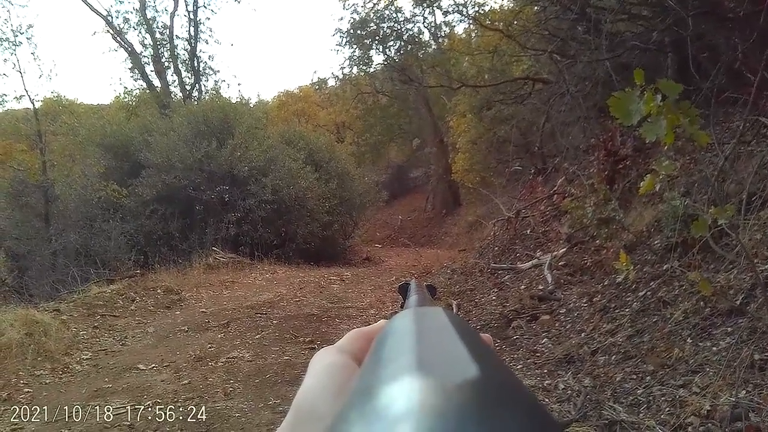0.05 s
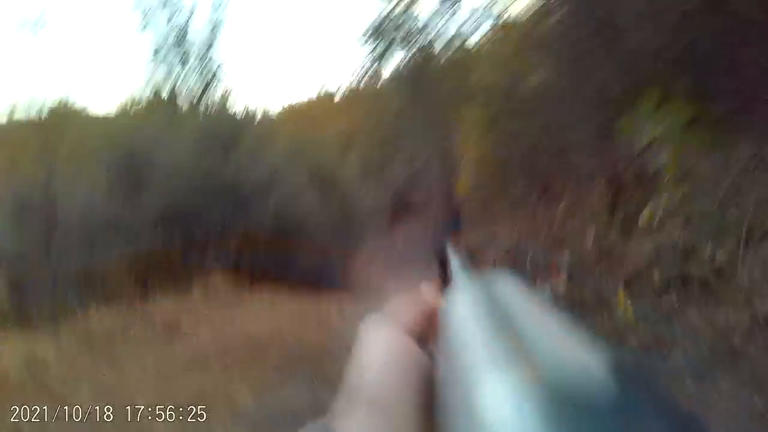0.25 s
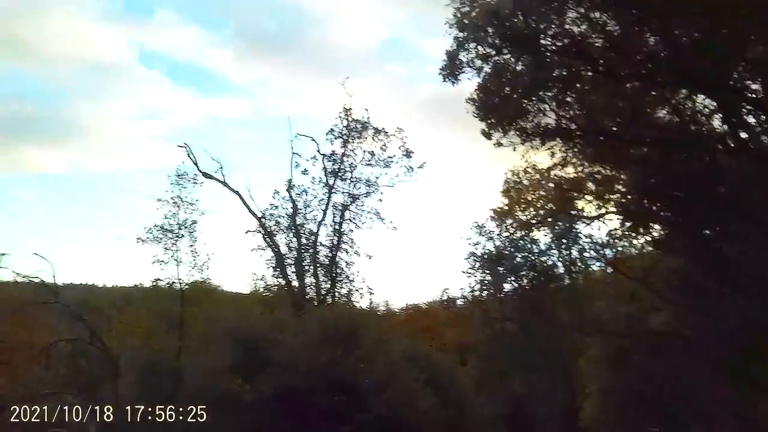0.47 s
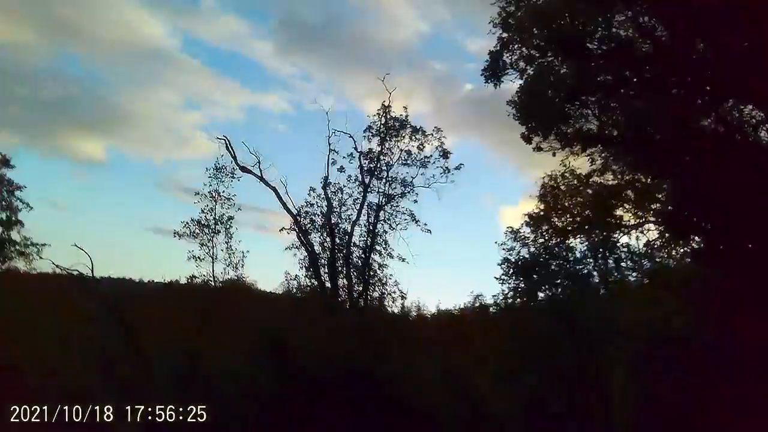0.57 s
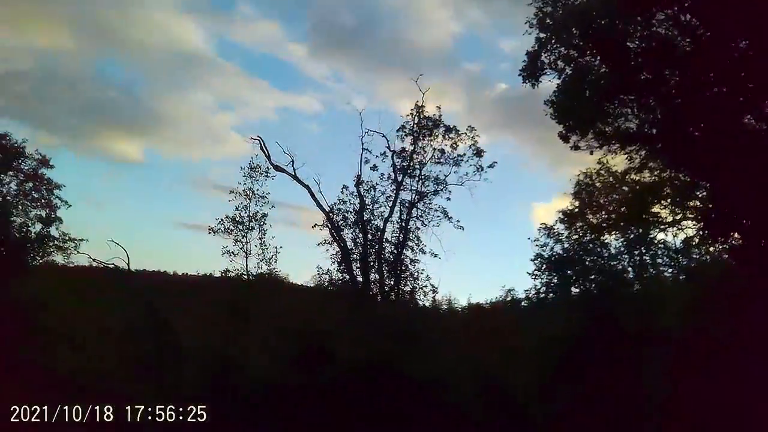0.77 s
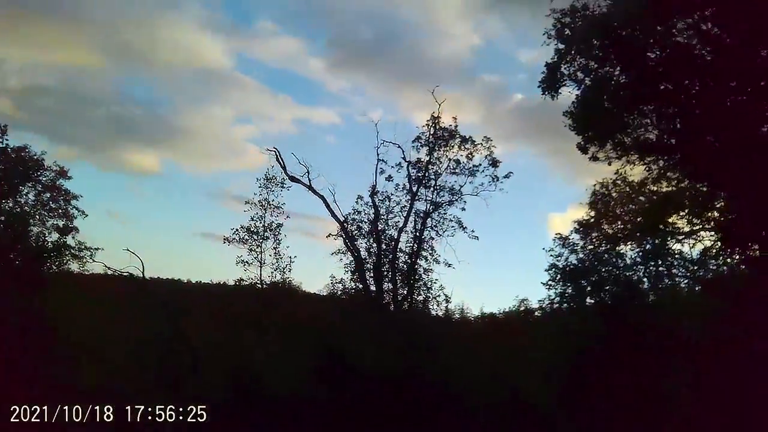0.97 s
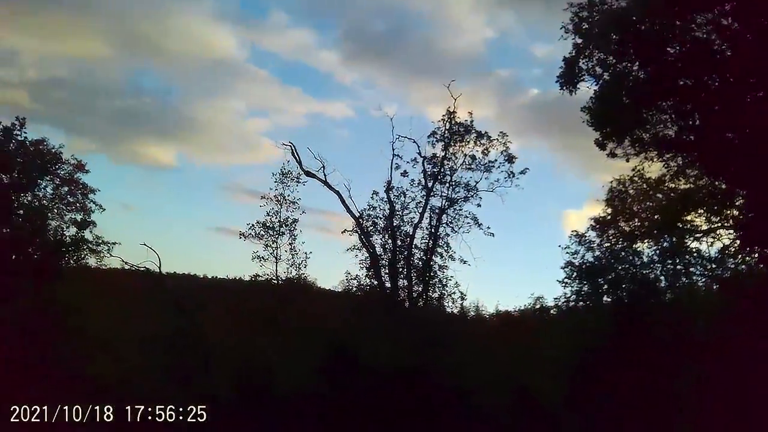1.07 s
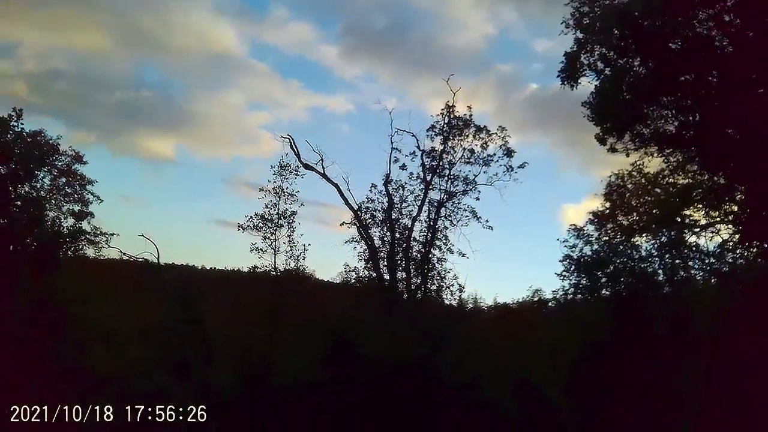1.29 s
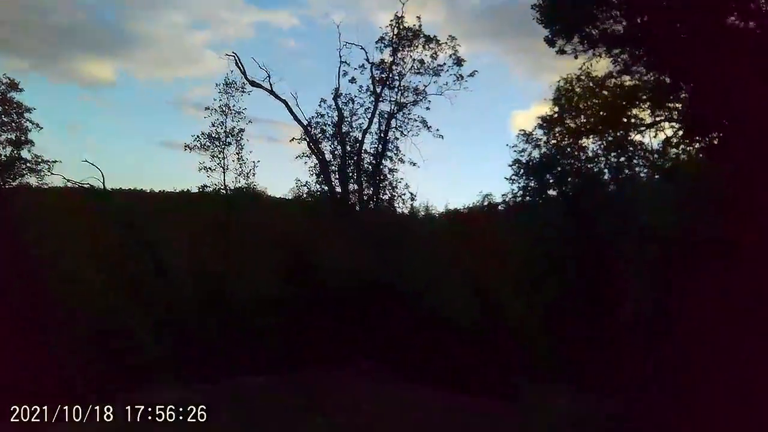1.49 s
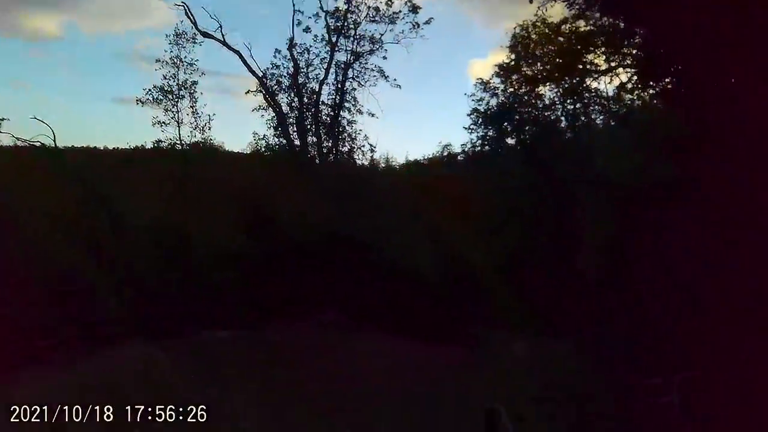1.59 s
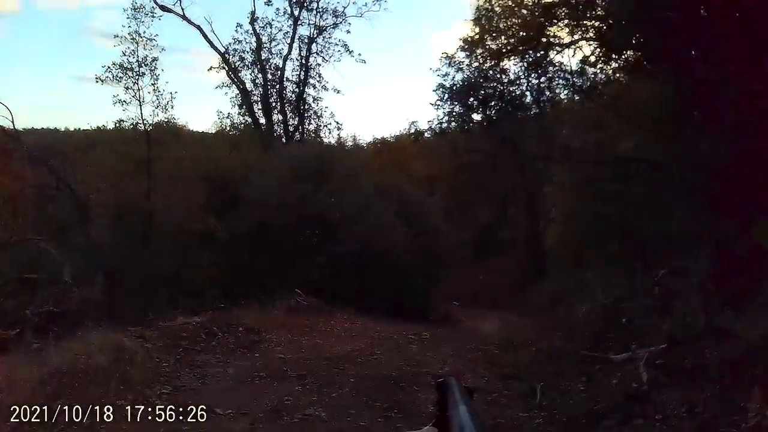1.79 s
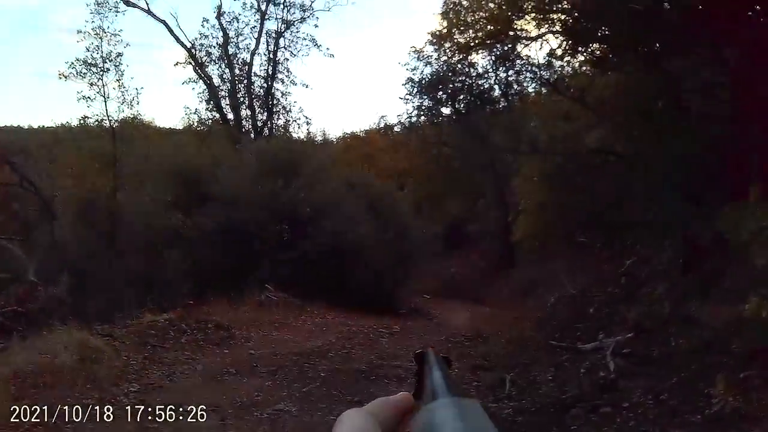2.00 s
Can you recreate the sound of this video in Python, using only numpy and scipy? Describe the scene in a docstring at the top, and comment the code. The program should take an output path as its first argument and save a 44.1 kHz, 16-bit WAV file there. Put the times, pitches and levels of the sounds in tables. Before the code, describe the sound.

A shotgun blast echoes through woods, followed by short plastic rattles and knocks.

```python
"""A shotgun fires on a wooded trail, overloading the microphone of a small camera beside it.
The blast cracks and booms, and its echoes roll away through the trees, dulled by the air.
The recoil jolts the camera, which bumps and rattles in its mount. As the gun is lowered,
clothing rustles faintly and small metal parts click together and ring."""
import sys
import numpy as np
from scipy import signal
from scipy.fft import rfft, irfft
from scipy.io import wavfile
from scipy.ndimage import uniform_filter1d

SR = 44100
rng = np.random.default_rng(int(sys.argv[2]) if len(sys.argv) > 2 else 0)


def generate_wav(signal):
    """Clip the signal to [-1, 1] and save it as 16-bit WAV at the path in sys.argv[1]."""
    frames = np.transpose(np.atleast_2d(signal))
    scaled = np.clip(frames, -1, 1) * 32767
    pcm = np.round(scaled).astype(np.int16)
    wavfile.write(sys.argv[1], SR, pcm)


N = 90404


def amp(db):
    """Converts decibels to an amplitude ratio."""
    return 10 ** (np.asarray(db) / 20)


def unit_rms(x):
    """Normalises a signal to unit mean power."""
    return x / np.sqrt(np.mean(x ** 2) + 1e-20)


def spectrum_db(points, hz):
    """Interpolates a spectrum on a logarithmic frequency axis."""
    f, db = np.transpose(points)
    return np.interp(np.log(hz + 1), np.log(f + 1), db)


def envelope(points):
    """Interpolates a level curve in dB to a gain at every sample."""
    return amp(np.interp(np.arange(N) / SR, *np.transpose(points)))


def add(mix, start, sound):
    """Superposes a sound on the mix at a start time in seconds."""
    part = mix[round(start * SR):][:len(sound)]
    part += sound[:len(part)]


def colour(x, points, size=4096):
    """Minimum-phase filter: the phase follows from the log gain by the Hilbert transform."""
    log_gain = np.log(amp(spectrum_db(points, abs(np.fft.fftfreq(size, 1 / SR)))))
    taps = np.fft.ifft(np.exp(np.conj(signal.hilbert(log_gain)))).real
    return signal.oaconvolve(x, taps[:size // 2])[:len(x)]


def noise(points):
    """Filters white noise to the given spectrum, at unit power."""
    return unit_rms(colour(rng.standard_normal(N), points))


def resonate(x, hz, width_hz):
    """A damped resonator passes a band around its natural frequency."""
    pole = np.exp((2j * hz - width_hz) * np.pi / SR)
    return 2 * signal.lfilter([1 - abs(pole)], [1, -pole], x).real


def steadied(x, size=90):
    """Divides noise by its running rms, so that an envelope alone sets its strength."""
    return x / np.sqrt(abs(uniform_filter1d(x ** 2, size)) + 1e-12)


def hammer(start=.1938, db=-29, decay_s=.003):
    """A short impact has a broad spectrum: the hammer ticks just before the blast."""
    out, t = np.zeros(N), np.arange(SR // 20) / SR
    add(out, start, amp(db) * np.exp(-t / decay_s) * rng.standard_normal(len(t)))
    return out


def shot(start=.2016, rise_s=.00026, crack_decay_s=.021, boom_decay_s=.036):
    """A pressure front cracks and booms; air absorption takes more treble from each later echo."""
    # Spectra of the bright front, the low muzzle blast and the echoes.
    # Each row: frequency in Hz, level in dB.
    crack_tone = [(30, -21), (150, -9), (450, -4.5), (800, -12.5), (1300, -8.5), (2100, 0.5), (3200, -7),
                  (4200, -5), (6400, -7), (9000, -10.5), (14000, -17)]
    boom_tone = [(20, -10), (50, -3.5), (105, -0.5), (170, -13), (400, -29), (3000, -60.5)]
    echo_tone = [(30, -25.5), (110, -18.5), (250, -7), (520, -4), (900, -1.5), (1450, -6.5), (2200, -3),
                 (4000, -6.5), (6400, -8.5), (9000, -17.5), (14000, -24)]
    # Return from ground, trees and hillside. Each row: time in seconds, level in dB.
    echo_levels = [(.2, -17), (.225, -13.5), (.25, -13.5), (.276, -18.5), (.307, -22.5), (.33, -17),
                   (.39, -25), (.47, -23), (.525, -21), (.541, -24.5), (.56, -21), (.7, -30.5), (.8, -26),
                   (.9, -40), (.97, -36), (1.05, -45.5), (1.2, -47), (1.33, -54), (1.6, -62.5), (2.05, -54)]
    clump_db, air_db_per_khz_s = 2.05, 4.5
    hz, t, bands = signal.stft(noise(echo_tone), SR, nperseg=256)
    clumps = uniform_filter1d(rng.standard_normal(bands.shape), size=9, axis=0)
    clumps = unit_rms(uniform_filter1d(clumps, size=3, axis=1))  # patchy in frequency and time
    absorbed_db = air_db_per_khz_s * hz[:, None] / 1000 * np.maximum(t - start, 0)
    echoes = signal.istft(bands * amp(clump_db * clumps - absorbed_db), SR, nperseg=256)[1][:N]
    age = np.maximum(np.arange(N) / SR - start, 0)
    crack = amp(4) * np.exp(-age / crack_decay_s) * noise(crack_tone)
    boom = amp(-17.5) * np.exp(-age / boom_decay_s) * steadied(noise(boom_tone), size=900)
    return np.minimum(age / rise_s, 1) * (echoes * envelope(echo_levels) + crack + boom)


def camera_bumps():
    """Heavy damping: soft blows to the camera swell and die within a few cycles, with some scuffing."""
    # Blows to the body. Each row: start in seconds, level in dB, pitch in Hz, decay in seconds.
    blows = [(.2932, -25.5, 215, 0.0029), (.3262, -25, 1160, 0.0029), (.3402, -22, 285, 0.0036),
             (.3621, -19.5, 225, 0.0038), (.3631, -12.5, 940, .0014), (.4082, -22.5, 425, 0.0046),
             (.4618, -20.5, 880, 0.0035), (.5016, -7, 745, 0.0017), (.5432, -30, 172, 0.0036),
             (.5501, -12.5, 735, 0.0019), (.5588, -19.5, 910, .0029), (.6238, -22, 122, 0.0031),
             (.6248, -12, 1340, 0.0037), (.7282, -24.5, 770, .0028), (.7428, -23, 860, .0027),
             (.7772, -21, 820, 0.0033), (.7942, -20.5, 790, 0.002), (.8611, -22.5, 128, 0.0017),
             (.8628, -11, 305, .0011), (.9413, -24.5, 322, 0.0012)]
    out, t = np.zeros(N), np.arange(SR // 10) / SR
    for start, db, hz, decay in blows:
        width_hz = 2.5 * hz
        scuff = resonate(rng.standard_normal(len(t)), hz, width_hz)
        scuff = steadied(resonate(scuff, hz, width_hz))
        swell = amp(db) * t / decay * np.exp(1 - t / decay)
        blow = swell * (np.sin(2 * np.pi * hz * t) + .5 * scuff)
        low_cut = signal.butter(2, .66 * hz, "high", fs=SR)
        add(out, start, signal.lfilter(*low_cut, blow))
    return out


def mount_rattle(rise_s=.00034, ring_width_hz=600):
    """Impacts excite a resonance: plastic knocks ring the housing, rebound and leave a faint buzz."""
    # Knocks in the mount. Each row: start in seconds, level in dB, decay in seconds, ring in Hz.
    knocks = [(0.5027, -20.5, 0.0022, 4030), (.5072, -19, 0.0035, 3750), (0.5203, -0.5, 0.0015, 3950),
              (0.549, -19, .0015, 4000), (0.5846, -8, 0.0022, 3870), (0.5913, -11.5, 0.0069, 4360),
              (.597, -2.5, 0.0033, 3870), (0.6043, -3, 0.0036, 3880), (0.6166, -14.5, 0.0055, 3930),
              (0.623, 13, 0.0026, 3780), (.632, 2, 0.0047, 3570), (0.6385, -0.5, 0.0027, 3450),
              (0.6736, -15, 0.0017, 3550), (0.677, -17, 0.0027, 3600), (.686, -24.5, 0.005, 3880),
              (0.707, -25.5, 0.0018, 3894), (0.734, -26.5, 0.0012, 3903), (0.7553, -21.5, 0.006, 3830),
              (.771, -15.5, 0.0035, 3780), (.776, -11.5, 0.0065, 3600), (0.7905, -11, 0.0015, 3894),
              (0.7956, -8, 0.0032, 3500), (0.8015, 2.5, 0.0023, 3910), (.812, -7, 0.003, 3480),
              (0.8163, -4, 0.0035, 3460), (.8205, -7, .003, 3120), (0.827, -3.5, 0.0035, 3430),
              (0.8327, -4.5, 0.003, 3400), (0.8415, -3.5, 0.0037, 3560), (0.8484, -10, 0.003, 3100),
              (.852, -8, .003, 3300), (.856, -5.5, 0.0025, 3700), (0.8623, 10.5, 0.0027, 3540),
              (0.868, 5, 0.0021, 3600), (0.8913, -19.5, 0.00093, 3420), (0.907, -18.5, 0.0016, 2590),
              (0.9506, -24.5, 0.0012, 4140)]
    # Spectrum of the knocks. Each row: frequency in Hz, gain in dB.
    knock_tone = [(30, -27.5), (200, -19.5), (800, -2), (1800, -3), (3000, -2), (6400, 1), (9000, 0.5),
                  (14000, -8)]
    rebounds_per_s, rebound_s, chatter_s, buzz_s = 610, .0012, .0069, .03
    loose_db = -11  # knocks harder than this shake no more loose
    out, t = np.zeros(N), np.arange(SR // 5) / SR
    for start, db, decay, hz in knocks:
        contact = rng.standard_normal(len(t))
        ring = steadied(contact + amp(-2) * unit_rms(resonate(contact, hz, ring_width_hz)))
        hits = rng.random(len(t)) < rebounds_per_s / SR
        rebounds = signal.lfilter([1], [1, -np.exp(-1 / (SR * rebound_s))], hits)
        chatter = amp(-13) * rebounds * np.exp(-t / chatter_s)
        buzz = amp(-27) * np.exp(-t / buzz_s)
        strength = amp(db) * np.exp(-t / decay) + amp(min(db, loose_db)) * (chatter + buzz)
        add(out, start, np.minimum(t / rise_s, 1) * strength * ring)
    return colour(out, knock_tone)


def scatter(x, tone, db, decay_s):
    """Diffuse reflection: many small echoes merge into an exponentially decaying tail."""
    t = np.arange(SR // 2) / SR
    tail = noise(tone)[:len(t)] * np.exp(-t / decay_s)
    return x + amp(db) * signal.oaconvolve(x, tail / np.linalg.norm(tail))[:N]


def metal_ping(start=.632, db=-27, decay_s=.031):
    """A narrow resonance: after the hardest jolt a small metal part rings, thin and high."""
    out, t = np.zeros(N), np.arange(SR // 5) / SR
    ring = unit_rms(resonate(rng.standard_normal(len(t)), hz=11540, width_hz=450))
    add(out, start, amp(db) * np.exp(-t / decay_s) * ring)
    return out


def clothing_rustle():
    """Friction between folds of cloth makes a soft noise that grows as the gun comes down."""
    # Spectrum of the rubbing. Each row: frequency in Hz, level in dB.
    cloth_tone = [(30, -12), (150, -9.5), (500, -5.5), (800, 0), (1400, -14), (4000, -23), (9000, -32.5),
                  (15000, -38.5)]
    # Strength of the rubbing. Each row: time in seconds, level in dB.
    cloth_levels = [(0, -77), (1.2, -70.5), (1.5, -62), (1.65, -64), (1.73, -62), (1.87, -62),
                    (1.95, -58.5), (2.05, -57)]
    return noise(cloth_tone) * envelope(cloth_levels)


def gun_clicks(rise_s=.00099, grit_db=-11.5, grit_decay_s=.0042):
    """Modal vibration: metal parts meet, and the point of contact decides which modes ring."""
    # Contacts as the gun is lowered. Each row: start in seconds, level in dB, centre of the ring
    # in Hz, fall to either side in dB per octave.
    contacts = [(1.555, -26.5, 1800, 26), (1.5545, -39, 4100, 33.5), (1.56, -45, 3850, 30.5),
                (1.5788, -32, 4600, 27), (1.5829, -25.5, 3500, 1.5), (1.875, -53, 6990, 9.5),
                (2.002, -54, 4120, 25.5)]
    # Modes of the parts. Each row: frequency in Hz, level in dB, time to fall 60 dB in seconds.
    modes = [(684, -15, 0.043), (1203, -8.5, 0.012), (1820, -14, 0.014), (2698, -3, 0.013),
             (3467, 2, 0.019), (3873, -4, 0.017), (4090, -12, 0.024), (4750, -2.5, 0.0095),
             (6310, 0.5, 0.011), (8850, -5.5, 0.011)]
    out, t = np.zeros(N), np.arange(SR // 10) / SR
    for start, db, centre_hz, fall_db in contacts:
        ring = np.zeros(len(t))
        for hz, mode_db, t60 in modes:
            gain = amp(mode_db - fall_db * abs(np.log2(hz / centre_hz)))
            ring += gain * amp(-60 * t / t60) * np.sin(2 * np.pi * (hz * t + rng.random()))
        grit = np.exp(-t / grit_decay_s) * rng.standard_normal(len(t))
        grit *= amp(grit_db) * np.linalg.norm(ring) / np.linalg.norm(grit)
        add(out, start, amp(db) * np.minimum(t / rise_s, 1) * (ring + grit))
    return out


def scene():
    """Superposition: the sources and their reflections add at the microphone."""
    # Reflection spectra of the trees, and of ground and brush. Each row: frequency in Hz, level in dB.
    tree_tone = [(100, -8), (800, -0.5), (2500, -5.5), (4000, -6), (6500, 2), (9000, -4), (14000, -15.5)]
    ground_tone = [(100, -8.5), (800, 6), (2500, -4.5), (6000, -34.5), (14000, -21)]
    rattle = scatter(mount_rattle(), tree_tone, db=-33, decay_s=.05)
    clicks = scatter(gun_clicks(), ground_tone, db=-12.5, decay_s=.014)
    return (shot() + hammer() + rattle + metal_ping() + camera_bumps() + clothing_rustle() + clicks)[None]


def record(dry, hiss_db=-65.5, clip_level=.51, knee=24):
    """Saturation: the input flattens the peaks of the port-coloured sound, then limits its bandwidth."""
    # Resonances of the microphone's port, steady hiss and treble roll-off.
    # Each row: frequency in Hz, level in dB.
    port_tone = [(20, -5.5), (2800, 1), (3500, 1.5), (4200, 5), (4700, -2.5), (5200, -12.5), (5800, -3.5),
                 (6400, 0), (7000, -3), (7600, -11), (8500, 0.5), (9600, -14.5), (10500, -15), (11700, -8),
                 (13000, -17), (16000, -18)]
    hiss_tone = [(25, 2), (120, -1), (250, -3), (600, -10), (1200, -15), (2500, -17.5), (12000, -21),
                 (15000, -24)]
    roll_off = [(9000, 0), (13000, 2), (14400, -6), (15200, -26), (16000, -49)]
    x = colour(dry[0], port_tone) + amp(hiss_db) * noise(hiss_tone)
    x = x / (.5 + abs(x / clip_level) ** knee) ** (1 / knee)
    x = signal.lfilter(*signal.butter(1, 10, "high", fs=SR), x)  # low cut at 10 Hz
    treble_gain = amp(spectrum_db(roll_off, np.fft.rfftfreq(2 * N, 1 / SR)))
    x = irfft(rfft(x, 2 * N) * treble_gain)[:N]
    steep_low_pass = signal.firwin(511, cutoff=15935, window=("kaiser", 9), fs=SR)
    return signal.oaconvolve(x, steep_low_pass, "same")[None]


dry = scene()
out = record(dry)
generate_wav(out)
```